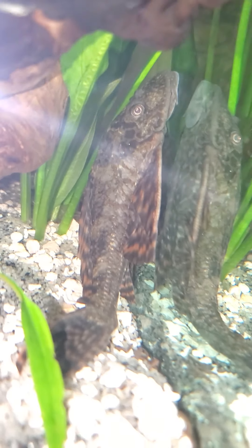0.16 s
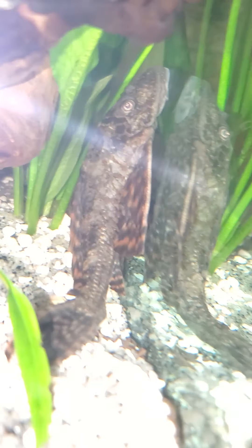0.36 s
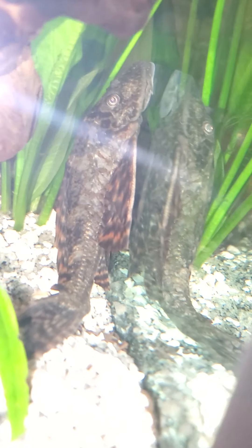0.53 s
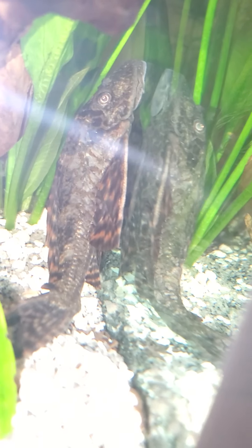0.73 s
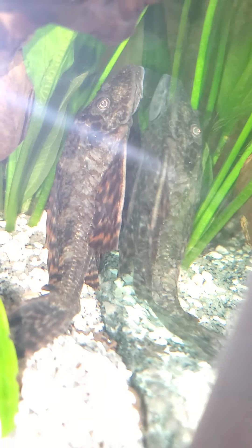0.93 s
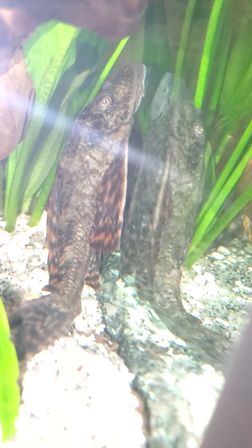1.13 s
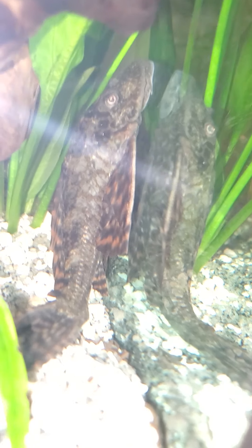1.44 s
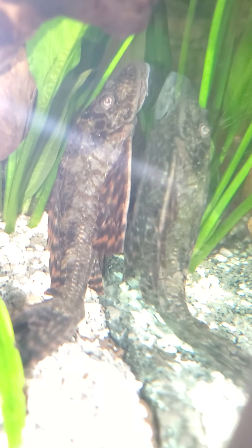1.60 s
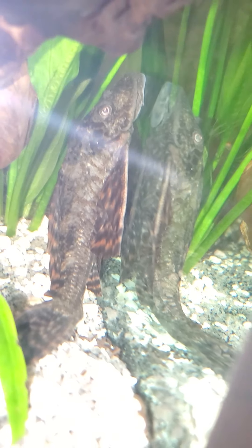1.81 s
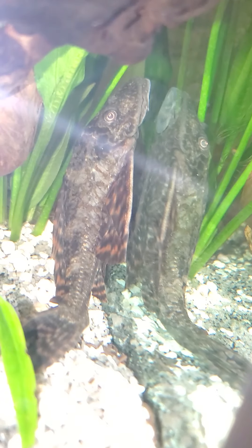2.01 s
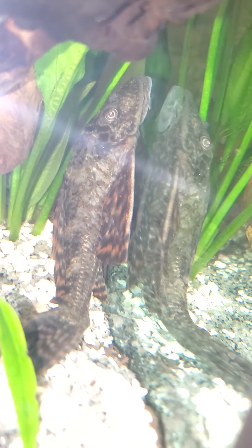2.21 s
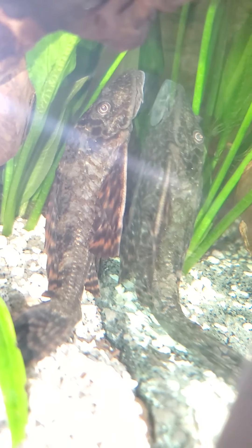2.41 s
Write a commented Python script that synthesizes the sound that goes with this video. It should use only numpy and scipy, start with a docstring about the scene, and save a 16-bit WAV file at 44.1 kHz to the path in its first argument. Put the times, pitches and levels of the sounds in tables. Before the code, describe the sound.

An aquarium pump hums low and steady while filter water rushes softly and bubbles trickle

```python
"""An aquarium pump hums: sines on the mains frequency and its multiples, each wavering in level.
Water rushes through the filter: coloured stereo noise with cabinet resonances.
Bubbles pop and trickle in a small room: decaying sines of rising pitch, with a noise echo.
Near dry plops and dull taps sound at the right microphone: decaying sines of fixed pitch.
The hand holding the phone brushes, shifts and bumps there too: filtered noise and one low thump."""
import sys
import numpy as np
from scipy import signal
from scipy.fft import rfft, irfft, next_fast_len
from scipy.io import wavfile
from scipy.ndimage import uniform_filter1d

SR = 44100
rng = np.random.default_rng(int(sys.argv[2]) if len(sys.argv) > 2 else 0)


def wav_out(sig):
    """Save sig, one row per channel (or a flat mono array), as 16-bit PCM at SR to the path in sys.argv[1]."""
    wavfile.write(sys.argv[1], SR, np.round(np.clip(np.atleast_2d(sig).T, -1, 1) * 32767).astype(np.int16))


N = 112454

# pump hum through cabinet and glass: mains multiple, mean level/dB rms, left-right/dB, left phase lead/rad
HUM_PARTIALS = [(1, -43.6, -1.6, -0.3), (2, -40.6, -0.3, -0.0), (3, -61.0, -0.1, 0.2),
                (4, -59.8, -8.4, -1.7), (5, -62.4, -7.6, 1.4), (6, -57.7, 4.2, 0.5), (7, -69.1, -3.7, 0.1),
                (8, -67.5, 0.1, -2.5), (9, -68.8, 1.6, -0.1), (10, -63.8, 3.0, 0.5), (11, -69.2, 1.4, -0.3),
                (12, -74.4, 1.3, 0.0), (13, -84.8, -13.9, -2.0), (14, -75.4, 8.1, -0.5),
                (15, -77.5, -9.4, -3.0), (16, -79.2, -0.3, -0.8), (17, -80.8, -11.6, -2.1),
                (18, -75.6, 4.3, -2.4), (19, -81.0, 1.8, -1.0), (20, -78.0, 2.9, 2.9),
                (26, -89.4, -6.0, -0.4), (28, -86.3, -11.5, 0.7), (29, -76.9, 3.1, -0.6),
                (31, -88.7, -16.4, 1.1), (32, -89.1, -8.0, -1.1), (34, -86.0, -21.7, -0.5),
                (35, -86.3, -5.4, -0.2), (36, -91.6, -2.9, 2.4), (37, -92.1, -14.6, -0.2),
                (39, -93.7, -4.4, 0.8), (46, -88.8, -15.8, -2.4), (48, -97.5, -8.8, -0.6),
                (51, -98, 2.5, 1.4), (52, -99.8, -12.2, -2.3)]
# gain of the whine multiple, swelling and fading: t/s, gain/dB
WHINE_GAIN = [(0, -2), (.17, 3), (.38, -1), (.61, 4), (.78, 0), (1.03, 4), (1.12, -3), (1.29, -6),
              (1.45, 1), (1.6, 3), (1.78, 3), (1.84, -5), (2.55, -5)]
# rush of water and room, before trims: f/Hz, density/dB per Hz, left-right/dB, left-right correlation
RUSH_SPECTRUM = [(30, -85, -0.2, 0.57), (45, -83, -0.7, 0.86), (62, -71.4, -2.3, 0.88),
                 (85, -72.7, -1.2, 0.94), (110, -76.5, -1.6, 0.89), (150, -72.5, 1.2, 0.89),
                 (210, -74.4, -0.9, 0.96), (260, -78.7, 2.0, 0.87), (330, -80.6, 1.4, 0.75),
                 (400, -81.7, 1.9, 0.87), (480, -88.4, 0.8, 0.7), (600, -90.0, 2.2, 0.63),
                 (800, -95.2, -1.3, 0.56), (1000, -98, -1.8, 0.07), (1190, -96.8, 2.5, -0.19),
                 (1300, -104, 3.3, -0.29), (1530, -104.5, 1, -0.1), (1700, -99.4, -2.5, 0.14),
                 (2000, -103.1, -13.5, 0.08), (2300, -110, -7.4, 0.08), (2600, -111.9, -5.0, -0.11),
                 (3000, -112.8, -1.5, -0.13), (3700, -113.0, -2.3, -0.05), (4500, -118.2, 1.1, 0.04),
                 (5500, -116.5, 9.8, 0.0), (6000, -115.9, 13.2, 0.03), (6500, -110.9, 10.3, -0.04),
                 (7200, -110.8, 1.6, -0.05), (8200, -116.2, 1.6, -0.02), (10000, -117.7, 0.0, -0.03),
                 (11500, -117.3, -1.1, -0.0), (13500, -119.8, 1.8, 0.01), (15500, -119.4, 2.6, -0.0)]
# cabinet resonances in the rush: f/Hz, width/Hz, lift/dB
CABINET_MODES = [(124, 3.9, 3.5), (173.8, 10, 6.5), (222.3, 8.4, 6.5), (282.8, 6.5, 10), (584, 5.8, 7.5),
                 (1760, 92, -0.5), (2028, 134, 5.5), (2800, 54, 10)]
# clusters of popping bubbles, before the room: t/s, median f/Hz, level/dB rms, length/s, left-right/dB
BUBBLE_CLUSTERS = [(0.022, 1046, -68.5, 0.058, 3), (0.125, 4000, -88, 0.027, 9),
                   (0.165, 4930, -81.5, 0.042, 2), (0.102, 2310, -81, 0.19, -0.5),
                   (0.221, 1380, -71.5, 0.025, 4), (0.227, 1850, -73.5, .02, -1),
                   (0.339, 2600, -74.5, 0.0057, 0), (0.328, 9500, -81, 0.031, 2),
                   (0.413, 8450, -82, 0.061, 0), (0.476, 1100, -70, 0.029, -6), (0.484, 1400, -77, .05, 5),
                   (0.511, 690, -62, .01, 2), (0.597, 7600, -80.5, 0.077, 2), (0.654, 6830, -87.5, 0.3, -2),
                   (.7, 5460, -98, 0.06, 0), (0.961, 6300, -85, 0.073, 7), (0.975, 3600, -86, 0.032, -1),
                   (1.045, 1040, -73, .06, 6), (1.07, 1066, -68, .19, 2.5), (1.05, 623, -67, .2, 0),
                   (1.056, 6640, -82, 0.042, 3), (1.085, 1650, -80, 0.16, -12.5),
                   (1.168, 7050, -80, 0.03, 7), (1.091, 840, -67.5, .18, 5), (1.284, 1700, -67.5, .04, -2),
                   (1.271, 3020, -94, 0.036, -2), (1.369, 1100, -69, 0.019, -6),
                   (1.373, 1560, -75, 0.04, -3), (1.31, 1930, -75, .14, 4), (1.376, 2620, -86, .06, 10),
                   (1.431, 2900, -79.5, .05, -3), (0.99, 3720, -94, 0.24, -13),
                   (0.959, 7250, -84.5, 0.25, -6), (1.42, 7300, -80, 0.039, -1),
                   (1.497, 14800, -82, 0.087, 2), (1.581, 8600, -79.5, 0.038, -1),
                   (1.678, 682, -63, 0.02, -3), (1.729, 5700, -83.5, 0.031, -1), (1.786, 1150, -74, .04, 4),
                   (1.788, 1500, -75, 0.037, -3), (1.804, 6460, -89, 0.27, 2), (1.848, 3640, -82.5, .05, 3),
                   (2.03, 5100, -86, 0.028, 4), (2.034, 9800, -84.5, 0.1, 2), (2.085, 6100, -88, 0.088, 3),
                   (2.117, 660, -65, 0.022, 2), (2.362, 1800, -78, 0.011, 4), (2.383, 7300, -90, 0.054, 0)]
# single bubbles that stand out, before the room: t/s, initial f/Hz, initial level/dB, left-right/dB
SINGLE_DRIPS = [(.508, 1390, -61, 0), (1.054, 1210, -58, 7), (1.108, 1126, -54.5, 8),
                (1.282, 1860, -58, -8), (1.292, 1740, -53.5, -5), (1.37, 1510, -55, -8),
                (2.362, 1710, -62, 2)]
# skin brushing the right microphone: t/s, length/s, white-noise level before high-pass/dB, cutoff f/Hz
SKIN_BRUSHES = [(1.301, .002, -63, 3500), (1.314, .02, -60, 10000), (1.304, .12, -70, 9000),
                (1.329, .002, -53, 12500), (1.312, .025, -72, 4500), (1.348, .004, -70, 4000),
                (1.422, .003, -68, 2000), (1.437, .012, -64, 3000), (1.454, .012, -65, 6000),
                (1.462, .035, -68, 7000), (1.505, .035, -65, 13500), (1.575, .004, -68, 6000)]
# near dry plops and dull taps at the right microphone: t/s, f/Hz, level before attack/dB, 60 dB decay/s
PLOPS_AND_TAPS = [(.474, 1100, -46, 0.044), (1.373, 1090, -47, .03), (1.665, 950, -48, 0.012),
                  (1.733, 1140, -37, .008), (1.782, 1125, -48, .035)]
# rumble as the grip shifts: t/s, length/s, level/dB rms, centre f/Hz
GRIP_SHIFTS = [(0.043, 0.052, -43, 60.7), (.13, 0.24, -43, 59), (0.388, 0.04, -45, 62.5),
               (2.319, 0.082, -37.5, 80), (2.4, 0.076, -46, 74), (2.45, 0.058, -39.5, 61.5)]

MAINS_HZ, STROKE_S = 60, .0119   # right-channel troughs of the three lowest multiples meet at the stroke
HUM_WAVER_DB, HUM_WAVER_DB_PER_MULTIPLE = .5, .0561
HUM_WAVER_PER_S = 2.1   # times the root of the multiple
WHINE_MULTIPLE = 46
RUSH_TRIM_DB = -.38
TREBLE_HZ, TREBLE_TRIM_DB, TREBLE_DRIFT_DB, TREBLE_DRIFT_PER_S = 1240, -1.14, .5, 2.0
POPS_PER_CLUSTER, POP_FADE_DB = 160, -4   # fade over the cluster length
POP_CYCLES, DRIP_CYCLES = 16.0, 51   # cycles at initial pitch within a 60 dB decay
PITCH_SCATTER, PITCH_RISE = .1, .08   # log-pitch spread; share of extra phase (pop), of pitch (drip)
ROOM_T60_S, ROOM_ECHO_DB = .35, 3.0
ATTACK_S = .0006   # plops and taps
GRIP_HALF_WIDTH_OCTAVES = .41
BUMP_S, BUMP_HZ, BUMP_PEAK_DB, BUMP_SIGMA_S = 1.6802, 85, -26, .007
CUTOFF_HZ = 15800


def amp(db):
    """Decibels to gain."""
    return 10 ** (np.asarray(db) / 20)


def rms_one(x):
    """Scale to unit rms."""
    return x / np.sqrt(np.mean(x ** 2) + 1e-30)


def pan(db):
    """Left and right gains for a left-right difference."""
    return amp(np.array([[.5], [-.5]]) * db)


def drift(rate_per_s):
    """Random wander of unit rms: two-pole low-passed noise, computed every 40 samples."""
    pole = np.exp(-2 * np.pi * rate_per_s * 40 / SR)
    noise = rng.standard_normal(N // 40 + 2002)
    slow = signal.lfilter([1], [1, -2 * pole, pole * pole], noise)[2000:]   # settled part
    return np.interp(np.arange(N) / 40, np.arange(len(slow)), rms_one(slow))


def gate(start_s, length_s):
    """On-off window with linear ramps over the first and last quarter."""
    u = (np.arange(N) / SR - start_s) / length_s
    return np.clip(4 * np.minimum(u, 1 - u), 0, 1)


def hum():
    """Sines on the mains multiples; the higher ones waver faster and, save for the whine, more deeply."""
    t, out = np.arange(N) / SR, np.zeros((2, N))
    start_turns = rng.random(len(HUM_PARTIALS))
    for (k, db, lr_db, lead_rad), turn in zip(HUM_PARTIALS, start_turns):
        if k <= 3:
            turn = -.25 - k * MAINS_HZ * STROKE_S
        phase = 2 * np.pi * (k * MAINS_HZ * t + turn) + np.array([[lead_rad], [0]])
        waver_db = HUM_WAVER_DB
        if k != WHINE_MULTIPLE:
            waver_db += HUM_WAVER_DB_PER_MULTIPLE * k
        level_db = db + waver_db * drift(HUM_WAVER_PER_S * np.sqrt(k))
        if k == WHINE_MULTIPLE:
            level_db = level_db + np.interp(t, *np.transpose(WHINE_GAIN))
        out += np.sqrt(2) * amp(level_db) * pan(lr_db) * np.sin(phase)
    return out


def rush():
    """Noise coloured per channel, correlated by frequency; the treble drifts in level."""
    size = next_fast_len(N)
    hz = np.maximum(np.arange(size // 2 + 1) * SR / size, 1)
    table = np.array(RUSH_SPECTRUM)
    log_hz = np.log(table[:, 0])
    db, lr_db, alike = (np.interp(np.log(hz), log_hz, table[:, c]) for c in (1, 2, 3))
    for f, width, lift_db in CABINET_MODES:
        db = db + lift_db / (1 + (2 * (hz - f) / width) ** 2)
    db = db - 12 * np.maximum(np.log2(table[0, 0] / hz), 0)   # 12 dB/octave below the table
    alike = np.clip(alike, -1, 1)
    mid, side = rfft(rng.standard_normal((2, size)))
    both = np.sqrt((1 + alike) / 2) * mid + np.sqrt((1 - alike) / 2) * side * [[1], [-1]]
    both = both * amp(db) * pan(lr_db) * np.sqrt(SR / 2)
    treble_share = 1 / (1 + (TREBLE_HZ / hz) ** 4)
    low = irfft(both * (1 - treble_share), size)[:, :N]
    treble = irfft(both * treble_share, size)[:, :N]
    treble_db = TREBLE_TRIM_DB + TREBLE_DRIFT_DB * drift(TREBLE_DRIFT_PER_S)
    return amp(RUSH_TRIM_DB) * (low + treble * amp(treble_db))


def room(dry):
    """Direct sound plus an exponentially decaying noise tail, independent per channel."""
    t = np.arange(int(ROOM_T60_S * SR)) / SR
    echo = rng.standard_normal((2, len(t))) * amp(-60 * t / ROOM_T60_S)
    echo = amp(ROOM_ECHO_DB) * echo / np.sqrt(np.sum(echo ** 2, axis=1, keepdims=True))
    echo[:, 0] = 1   # direct sound
    return signal.fftconvolve(dry, echo, axes=1)[:, :N]


def pop_clusters():
    """Sprays of short decaying sines, scattered in time, pitch and strength, each rising in pitch."""
    out, table = np.zeros((2, N + SR)), np.array(RUSH_SPECTRUM)
    draws = rng.standard_normal((len(BUBBLE_CLUSTERS), 3, POPS_PER_CLUSTER, 1))
    for (s, hz, db, length, lr_db), (scatter, when, strength) in zip(BUBBLE_CLUSTERS, draws):
        pitch_hz = hz * np.exp(PITCH_SCATTER * scatter)
        u = np.arange(int((length + .03) * SR)) / SR
        late = .5 + .5 * np.tanh(.85 * when)   # onset as share of cluster length
        age = np.maximum(u - length * late, 0) * pitch_hz / POP_CYCLES   # 1 = 60 dB down
        cycles = POP_CYCLES * age * (1 + PITCH_RISE * np.minimum(age, 1))
        pops = strength * amp(POP_FADE_DB * late - 60 * age) * np.sin(2 * np.pi * cycles)
        # balance shifted by that of the rush at each pitch
        rush_lr_db = np.interp(np.log(pitch_hz[:, 0]), np.log(table[:, 0]), table[:, 2])
        gain = amp(db) * np.sqrt((length + .01) * SR / np.sum(pops ** 2))
        first = int(s * SR)
        out[:, first:first + len(u)] += pan(lr_db + rush_lr_db) @ pops * gain
    return out


def drips():
    """Single bubbles: longer decaying sines of rising pitch."""
    out, u = np.zeros((2, N + SR)), np.arange(SR // 10) / SR
    for s, hz, db, lr_db in SINGLE_DRIPS:
        age = u * hz / DRIP_CYCLES   # 1 = 60 dB down
        cycles = DRIP_CYCLES * age * (1 + PITCH_RISE * age / 2)
        first = int(s * SR)
        out[:, first:first + len(u)] += pan(lr_db) * amp(db - 60 * age) * np.sin(2 * np.pi * cycles)
    return out


def bubbles():
    """Pop clusters and drips, smeared into a tail by the room."""
    return room(pop_clusters() + drips())


def grip(white):
    """Rumble: gated band-passed noise, levelled by its running rms."""
    out = np.zeros(N)
    for s, length, db, hz in GRIP_SHIFTS:
        edges_hz = hz * 2 ** (GRIP_HALF_WIDTH_OCTAVES * np.array([-1, 1]))
        band = signal.butter(2, edges_hz, "band", fs=SR, output="sos")
        low = signal.sosfilt(band, white)
        running_rms = np.sqrt(uniform_filter1d(low ** 2, size=1500))
        out += amp(db) * gate(s, length) * low / running_rms
    return out


def plops_and_taps():
    """Near dry plops and dull taps: decaying sines of fixed pitch with a soft attack."""
    t, out = np.arange(N) / SR, np.zeros(N)
    for s, hz, db, t60_s in PLOPS_AND_TAPS:
        age_s = np.maximum(t - s, 0)
        attack = 1 - np.exp(-age_s / ATTACK_S)
        out += amp(db - 60 * age_s / t60_s) * attack * np.sin(2 * np.pi * hz * age_s)
    return out


def brushes(white):
    """Skin friction: gated high-passed noise."""
    out = np.zeros(N)
    for s, length, db, hz in SKIN_BRUSHES:
        high_pass = signal.butter(4, hz, "high", fs=SR, output="sos")
        out += amp(db) * gate(s, length) * signal.sosfilt(high_pass, white)
    return out


def bump():
    """One low thump: a cosine under a Gaussian envelope."""
    t = np.arange(N) / SR - BUMP_S
    return amp(BUMP_PEAK_DB) * np.exp(-.5 * (t / BUMP_SIGMA_S) ** 2) * np.cos(2 * np.pi * BUMP_HZ * t)


def hand():
    """Grip, brushes and bump on the phone's body; grip and brushes share one noise."""
    white = rng.standard_normal(N)
    return grip(white) + brushes(white) + bump()


def scene():
    """Pump, water and bubbles in stereo; hand, plops and taps on the right only."""
    right = hand() + plops_and_taps()
    return hum() + rush() + bubbles() + right * [[0], [1]]


def record(dry):
    """Steep elliptic low-pass."""
    return signal.sosfilt(signal.ellip(12, .5, 70, CUTOFF_HZ, fs=SR, output="sos"), dry)


dry = scene()
out = record(dry)
wav_out(out)
```